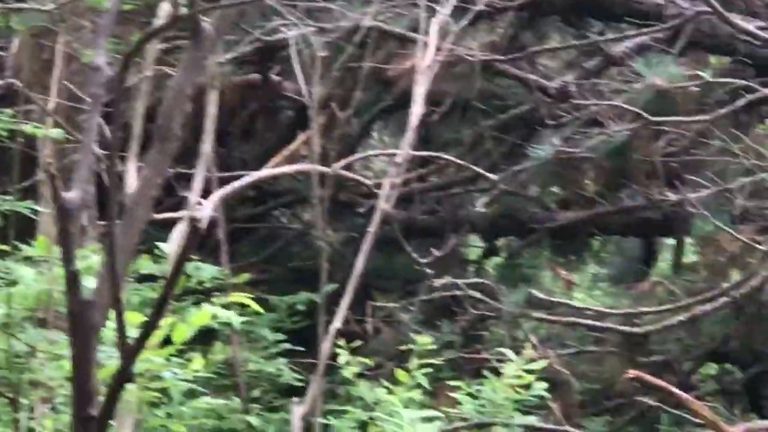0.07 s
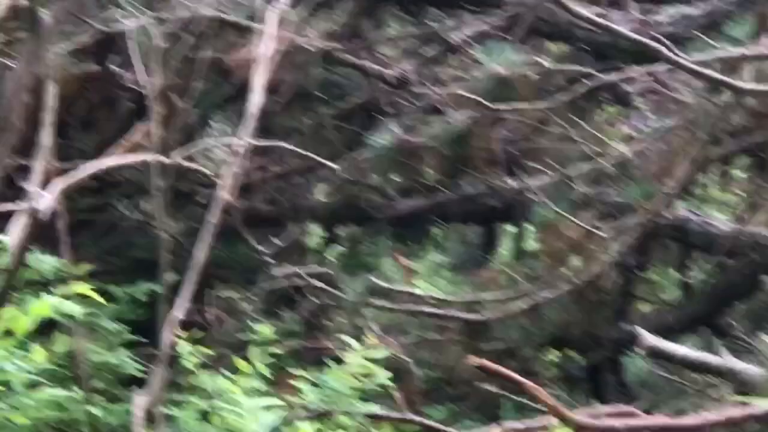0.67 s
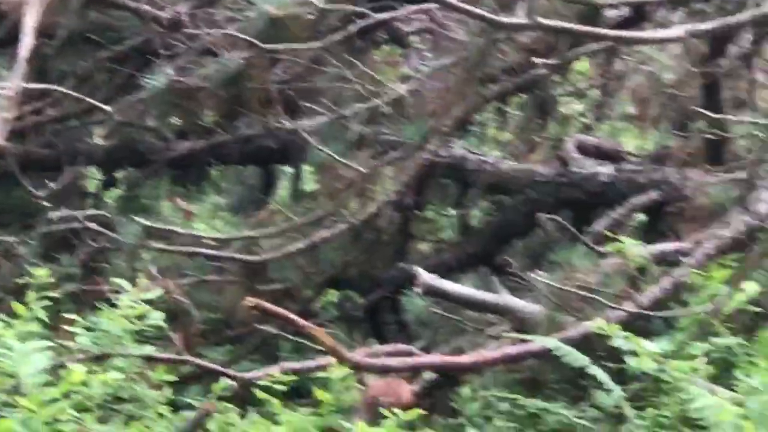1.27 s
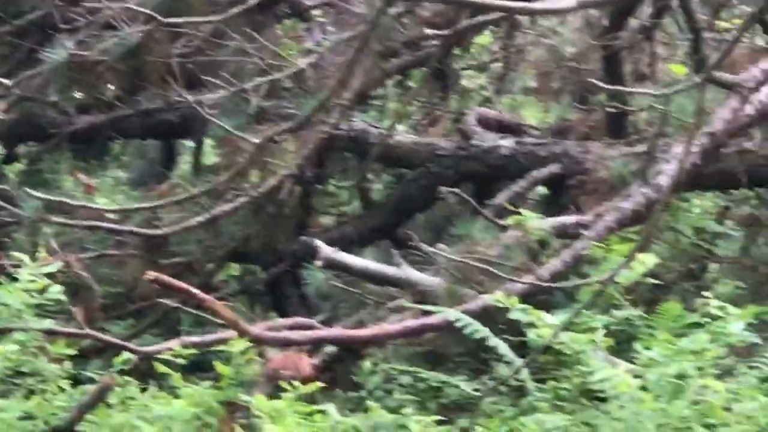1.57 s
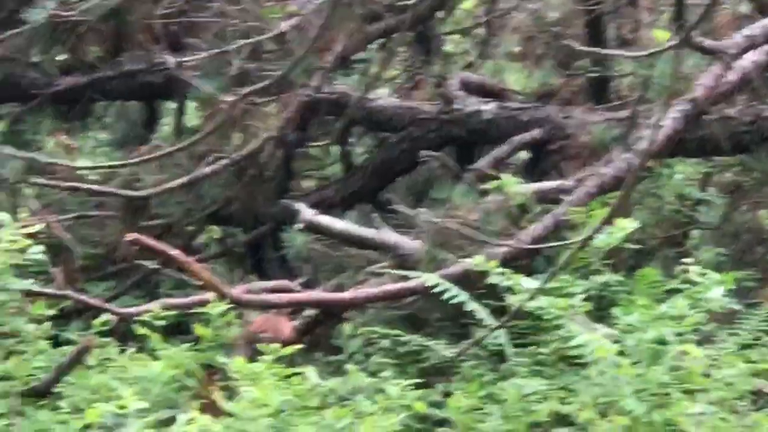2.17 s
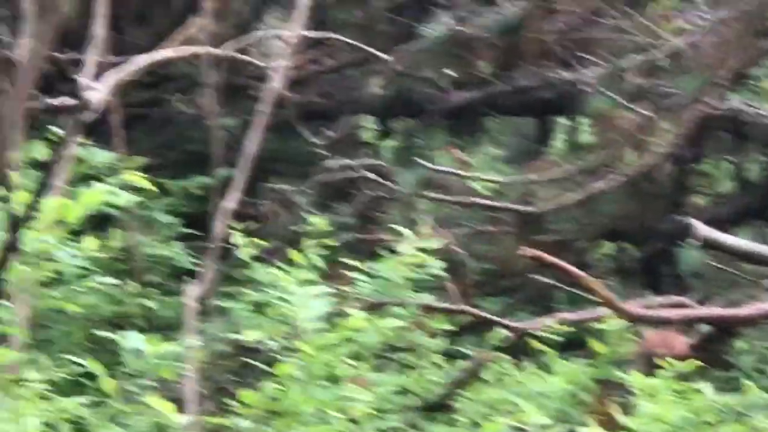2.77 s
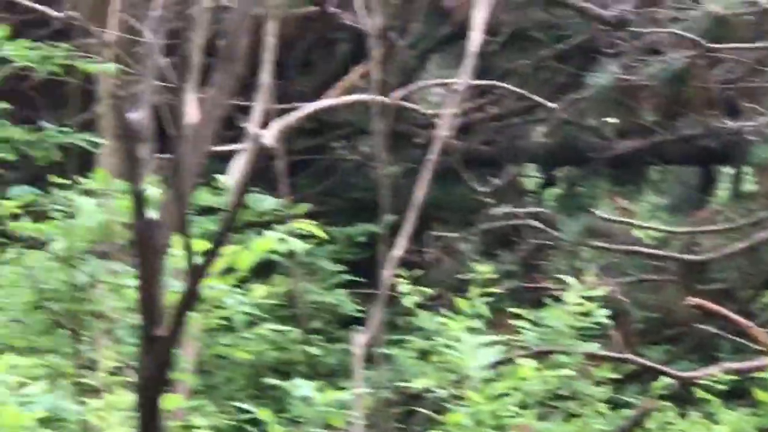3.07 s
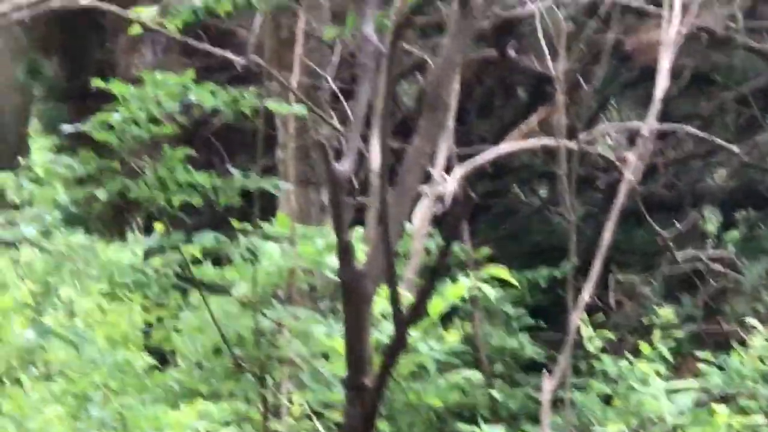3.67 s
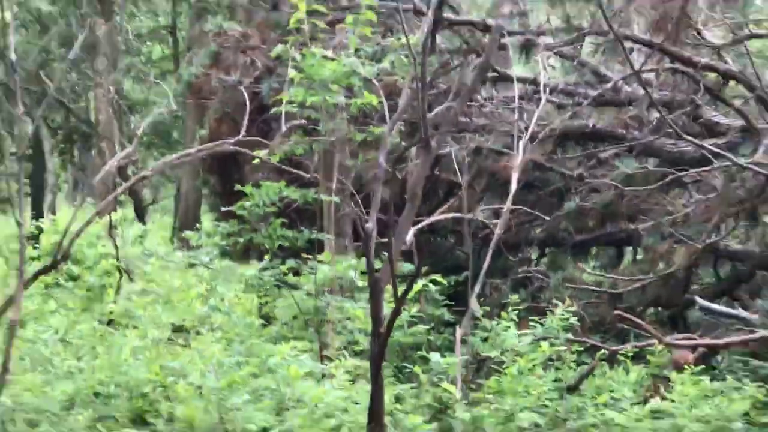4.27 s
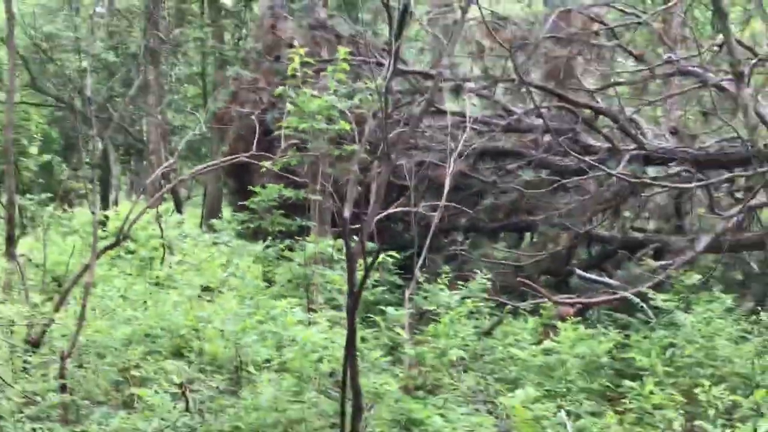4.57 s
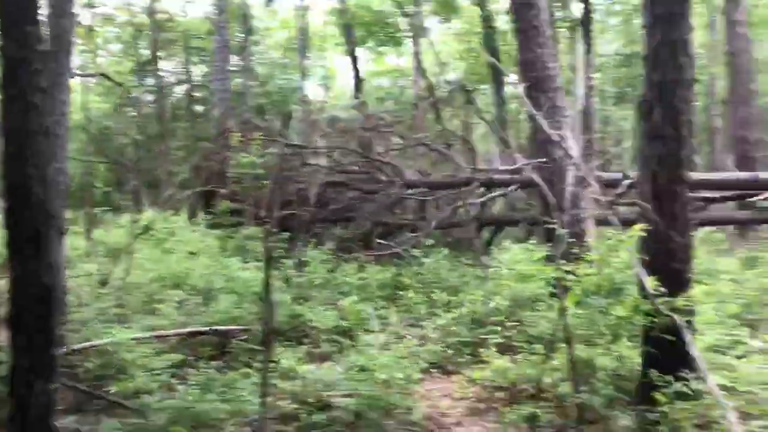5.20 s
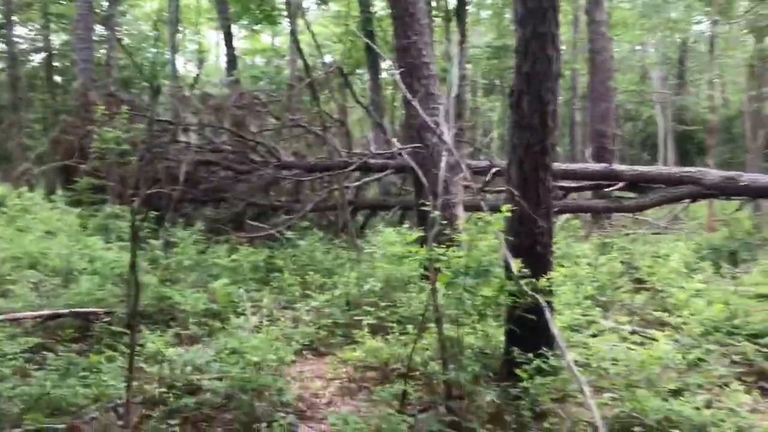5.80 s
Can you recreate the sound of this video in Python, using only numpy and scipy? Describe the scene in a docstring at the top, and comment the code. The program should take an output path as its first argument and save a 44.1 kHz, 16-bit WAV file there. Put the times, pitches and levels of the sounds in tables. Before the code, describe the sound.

A small songbird repeats a high whistled phrase, louder and louder, in quiet woodland, then dry twigs crack close by.

```python
"""Quiet woodland opens with a faint rumble of air, two slight twig clicks and tiny ticks in the leaf litter.
After about a second a small songbird begins a short phrase, sung eleven times, louder and louder:
a high double peak, a swoop, a low fall and a soft chip. Each note is a frequency-modulated whistle
that trunks and foliage scatter into a tail. As the song ends, without its last chip, dry twigs
crack close by, each a brief impulse with a damped ring, and go on clicking to the end."""
import sys
import numpy as np
from scipy import signal
from scipy.fft import rfft, irfft, next_fast_len
from scipy.io import wavfile
from scipy.ndimage import uniform_filter1d, map_coordinates

SR = 44100
rng = np.random.default_rng(int(sys.argv[2]) if len(sys.argv) > 2 else 0)


def to_wav(s):
    """Save 16-bit WAV."""
    ch = np.atleast_2d(s).T  # columns
    pcm = np.round(np.clip(ch, -1, 1) * 32767)  # PCM
    wavfile.write(sys.argv[1], SR, pcm.astype(np.int16))


N = 266452
BAND_LIMIT_HZ = 15850

# Contours of the four notes: (time within the note [s], frequency [Hz], relative level [dB])
PEAK_CONTOUR = [(-.006, 7230, -40), (-.002, 8500, -12), (.002, 9474, -10.5), (.0045, 8416, -1),
                (.009, 7037, -13), (.014, 7176, -10.5), (.019, 7260, -6.5), (.026, 9480, -10),
                (.031, 8400, -5.5), (.035, 6740, 3.5), (.041, 5590, 3), (.048, 4910, -3.5),
                (.053, 4540, -29)]
SWOOP_CONTOUR = [(-.004, 8530, -42), (.001, 8950, -7.5), (.005, 7860, -4.5), (.009, 6163, -2),
                 (.013, 4407, -4), (.018, 4068, -1), (.024, 4300, -2), (.031, 5493, -1), (.038, 6470, -4.5),
                 (.044, 6620, -13.5)]
FALL_CONTOUR = [(-.014, 4585, -10), (-.008, 4967, -3.5), (-.003, 5109, 0.5), (.001, 4935, 0),
                (.005, 4520, 4.5), (.012, 3803, 3.5), (.020, 3242, 2), (.029, 2845, -2), (.034, 2614, -11),
                (.039, 2780, -32)]
CHIP_CONTOUR = [(-.010, 3878, -29), (-.004, 3641, 3), (.002, 3470, 5), (.009, 3281, 1.5), (.016, 3200, 0.5),
                (.024, 3070, -31)]
# Phrases, timed at the low fall: (time [s], vocal effort [dB], stretch of the note spacing [ratio])
SONG_PHRASES = [(1.510, -28, 1.01), (1.8525, -20, 1.01), (2.2052, -15, 0.98), (2.506, -10.5, 0.98),
                (2.8061, -7, 0.99), (3.107, -5.5, 0.98), (3.403, -3, 0.97), (3.7033, -1, .994),
                (4.003, -0.2, 1.025), (4.3035, 0, 1.005), (4.6133, 0.5, 1.046)]
# Spectral envelope of the overtones: (frequency [Hz], relative level [dB])
OVERTONE_ENVELOPE = [(5000, -39), (10000, -37.5), (12800, -26), (13900, -26.5), (14800, -26), (16000, -40)]
# Reflections from groups of trunks: (delay [s], relative level [dB], time spread [s])
TRUNK_ECHOES = [(.003, -1, 0.0048), (0.016, -12, 0.022), (0.042, -14, 0.0066)]
# Decay of the far tail: (frequency [Hz], reverberation time T60 [s])
FOREST_T60 = [(500, 0.55), (2500, 0.63), (4000, 0.92), (6000, 0.74), (9000, 0.47), (15000, 0.48)]
# Breaking twigs: (time [s], knock gain [dB], ring frequency [Hz], crack gain [dB], crack cutoff [Hz])
TWIG_SNAPS = [(.340, -55, 2600, -63, 5000), (0.519, -58, 3000, -63, 5000), (3.776, -45, 990, -62, 2500),
              (3.7927, -40, 1950, -41, 3500), (4.6115, -35, 1200, -29, 3000),
              (4.705, -45.5, 1060, -74, 3000), (4.842, -42.5, 1400, -62, 3020),
              (4.8552, -42, 1663, -61, 3524), (4.858, -41.5, 1914, -45, 12160),
              (4.8889, -47, 1076, -43, 9970), (5.0074, -48, 1440, -42, 3000),
              (5.2235, -39, 2386, -46.5, 12000), (5.5752, -38.5, 1320, -44, 8040),
              (5.586, -45, 1340, -44.5, 3000), (5.667, -47, 2100, -54, 4000),
              (5.680, -38, 1210, -40, 10400), (5.6809, -43, 413, -46, 2000),
              (5.697, -58, 900, -48.5, 10000), (5.9765, -50, 1610, -50, 6000), (6, -59, 3200, -41.5, 15000),
              (6.0029, -49, 615, -39, 4400), (6.0065, -34, 590, -39, 3000)]
# Spectrum of the open air: (frequency [Hz], relative spectral density [dB])
AIR_SPECTRUM = [(13, -34), (22, -25), (45, -2.5), (66, -2), (82, -5), (112, -10.5), (183, -13), (326, -18),
                (430, -22), (649, -22), (855, -25.5), (1200, -27.5), (1900, -33.5), (4970, -38.5),
                (14500, -43.5), (15800, -41)]
# Slow drift of the open air: (time [s], rumble level [dB], hiss gain [dB])
AIR_DRIFT = [(0, -63, -64.5), (1.5, -65.5, -64), (2.6, -63.5, -64.5), (3.3, -65.5, -63.5),
             (4.9, -64.5, -62.5), (6.04, -65.5, -62.5)]


def bird():
    """Spectral balance shifts with vocal effort: the higher the note, the faster its level grows."""
    peak = sing(PEAK_CONTOUR, SONG_PHRASES, offset_s=-0.1763, full_db=-41, growth=2.1,
                depth=1.0, deepening=0.00083, overtone_db=11.5, tilt=0.71,
                trunk_db=-3.5, foliage_db=-4, far_db=-3)
    swoop = sing(SWOOP_CONTOUR, SONG_PHRASES, offset_s=-0.076, full_db=-40.5, growth=1.71,
                 depth=1.0, deepening=0.00092, overtone_db=5, tilt=0.63,
                 trunk_db=-3, foliage_db=-2, far_db=-2.5)
    fall = sing(FALL_CONTOUR, SONG_PHRASES, offset_s=0, full_db=-41, growth=0.95,
                depth=0.99, deepening=0.00717, lengthening=0.007, overtone_db=10.5, tilt=0.63,
                trunk_db=-4, foliage_db=-3.5, far_db=-5.5)
    chip = sing(CHIP_CONTOUR, SONG_PHRASES[:-1], offset_s=0.0568, full_db=-45, growth=0.74,
                depth=0.92, deepening=0.0018, overtone_db=2, tilt=0.092,
                trunk_db=-3.5, foliage_db=-5.5, far_db=-7.5)
    return peak + swoop + fall + chip


def sing(contour, phrases, offset_s, full_db, growth, depth, deepening, overtone_db, tilt,
         lengthening=0, steady_share=0.22, **path_levels):
    """Multipath propagation: a note recurs in each phrase, its echoes partly steady, partly changing."""
    song = np.zeros(N)
    steady_path = woods(**path_levels)
    for time_s, effort_db, stretch in phrases:
        # growth, lengthening and deepening all act per dB of effort
        rise_db = growth * effort_db
        sung = np.array(contour) * [1 + lengthening * effort_db, 1, 1]
        note = whistle(sung, depth + deepening * effort_db, rise_db, overtone_db, tilt)
        echoes = np.sqrt(steady_share) * steady_path + np.sqrt(1 - steady_share) * woods(**path_levels)
        onset_s = time_s + stretch * offset_s + sung[0, 0]
        add(song, onset_s, amp(full_db + rise_db) * with_echoes(note, echoes))
    return song


def whistle(contour, depth, rise_db, overtone_db, tilt,
            overtone_growth=0.87, waver=0.0077, flutter_db=2.0, order_step_db=-7, ceiling_db=-7):
    """Frequency modulation: a gliding sine whose overtones and top pitches fade when sung softly."""
    times, hz, db = np.transpose(contour)
    t = np.arange(times[0], times[-1], 1 / SR)
    glide = uniform_filter1d(np.interp(t, times, hz), size=110)
    pitch = glide.max() * (glide / glide.max()) ** depth  # depth scales the sweep below its top
    pitch *= 1 + waver * wobble(rate_hz=284, count=len(t))
    phase = 2 * np.pi * np.cumsum(pitch) / SR
    contour_db = np.interp(t, times, db)
    tone = amp(contour_db) * np.sin(phase)
    # The overtones follow the level contour only up to a ceiling.
    drive_db = np.minimum(contour_db, ceiling_db) + overtone_db + overtone_growth * rise_db
    for order in (2, 3, 4):
        gain = amp(drive_db + along(OVERTONE_ENVELOPE, order * pitch) + order_step_db * (order - 2))
        tone += gain * np.sin(order * phase) * (order * pitch < SR / 2)
    octaves = np.log2(pitch / pitch.mean())
    level_db = tilt * rise_db * octaves + flutter_db * wobble(rate_hz=199.3, count=len(t))
    return tone * amp(level_db) * signal.windows.tukey(len(t), 0.08)


def woods(trunk_db, foliage_db, far_db, foliage_t60_s=0.39, foliage_rise_s=0.0052, far_rise_s=0.011):
    """Reflection and scattering: an impulse response of foliage, trunk echoes and a long far tail."""
    def burst(envelope):
        """Enveloped noise of unit energy."""
        return unit(envelope * rng.standard_normal(SR)) / np.sqrt(SR)

    t = np.arange(SR) / SR
    foliage_envelope = (1 - np.exp(-t / foliage_rise_s)) * amp(-60 * t / foliage_t60_s)
    near = amp(foliage_db) * burst(foliage_envelope)
    for delay_s, echo_db, spread_s in TRUNK_ECHOES:
        echo_envelope = (t > delay_s) * np.exp(-abs(t - delay_s) / spread_s)
        near += amp(trunk_db + echo_db) * burst(echo_envelope)
    hz, age_s, spectrogram = signal.stft(rng.standard_normal(SR), SR, nperseg=256)
    band_decay = amp(-60 * age_s / along(FOREST_T60, hz)[:, None])
    tail = signal.istft(spectrogram * band_decay, SR, nperseg=256)[1][:SR]
    tail *= 1 - np.exp(-t / far_rise_s)
    return near + amp(far_db) * unit(tail) / np.sqrt(SR)


def twigs(crack_decay_s=0.00077, cycles_per_30_db=3.5, rise_cycles=0.36):
    """Impulsive excitation: each twig breaks with a noise burst and a knock damped in a few cycles."""
    clicks = np.zeros(N)
    t = np.arange(SR // 20) / SR
    for time_s, knock_db, ring_hz, crack_db, cutoff_hz in TWIG_SNAPS:
        cycles = ring_hz * t
        envelope = (1 - np.exp(-cycles / rise_cycles)) * amp(-30 * cycles / cycles_per_30_db)
        knock = envelope * np.sin(2 * np.pi * cycles)
        burst = rng.standard_normal(len(t)) * np.exp(-t / crack_decay_s)
        crack = signal.lfilter(*signal.butter(2, cutoff_hz, fs=SR), burst)
        add(clicks, time_s, amp(knock_db) * knock + amp(crack_db) * crack)
    return with_echoes(clicks, woods(trunk_db=-13, foliage_db=-22, far_db=-36))[:N]


def leaf_litter(count=16, level_db=-70, spread_db=6, centre_hz=2600, decay_s=0.0013):
    """Damped oscillation: dry leaves give tiny, noisy ticks at random moments."""
    ticks = np.zeros(N)
    t = np.arange(SR // 100) / SR
    for moment, strength, octaves in rng.uniform(-1, 1, (count, 3)):
        ring = np.sin(2 * np.pi * centre_hz * 2 ** octaves * t)
        tick = (ring + 0.5 * rng.standard_normal(len(t))) * np.exp(-t / decay_s)
        time_s = (moment + 1) / 2 * N / SR
        add(ticks, time_s, amp(level_db + spread_db * strength) * tick)
    return ticks


def air(crossover_hz=200, swell_db=1.5, swell_rate_hz=5):
    """Amplitude-modulated noise: a low rumble swells and sinks at random under a fine, even hiss."""
    noise = unit(filtered(rng.standard_normal(N), lambda hz: amp(along(AIR_SPECTRUM, hz))))
    rumble = filtered(noise, lambda hz: 1 / (1 + (hz / crossover_hz) ** 4))
    times, rumble_db, hiss_db = np.transpose(AIR_DRIFT)
    t = np.arange(N) / SR
    hiss = (noise - rumble) * amp(np.interp(t, times, hiss_db))
    rumble_gain = amp(np.interp(t, times, rumble_db) + swell_db * wobble(swell_rate_hz, N))
    return hiss + rumble_gain * unit(rumble)


def with_echoes(sound, echoes):
    """Convolution with an impulse response, added to the direct sound."""
    return np.pad(sound, (0, len(echoes) - 1)) + signal.fftconvolve(sound, echoes)


def amp(db):
    """The decibel law: level to amplitude ratio."""
    return 10 ** (np.asarray(db) / 20)


def unit(x):
    """Normalisation to an rms of 1."""
    return x / np.sqrt(np.mean(x ** 2) + 1e-20)


def along(points, hz):
    """Interpolation of (frequency [Hz], value) points on a logarithmic frequency axis."""
    frequencies, values = np.transpose(points)
    return np.interp(np.log(hz + 1), np.log(frequencies + 1), values)


def filtered(x, response):
    """Linear filtering: the spectrum of x times a frequency response."""
    size = next_fast_len(N + 8192)
    hz = np.fft.rfftfreq(size, 1 / SR)
    return irfft(rfft(x, size) * response(hz), size)[:N]


def wobble(rate_hz, count):
    """Random modulation: a smooth curve through rate_hz Gaussian values a second."""
    knots = rng.standard_normal(int(count * rate_hz / SR) + 4)
    return map_coordinates(knots, [np.arange(count) * rate_hz / SR])


def add(track, time_s, sound):
    """Superposition of a sound on the track from time_s on."""
    start = max(round(time_s * SR), 0)
    part = sound[:max(N - start, 0)]
    track[start:start + len(part)] += part


def scene():
    """Superposition of bird, twigs, leaf litter and air at one point."""
    return (bird() + twigs() + leaf_litter() + air())[None]


def record(dry):
    """Band limiting: an ideal low-pass filter removes the highest treble."""
    return np.array([filtered(channel, lambda hz: hz < BAND_LIMIT_HZ) for channel in dry])


dry = scene()
out = record(dry)
to_wav(out)
```